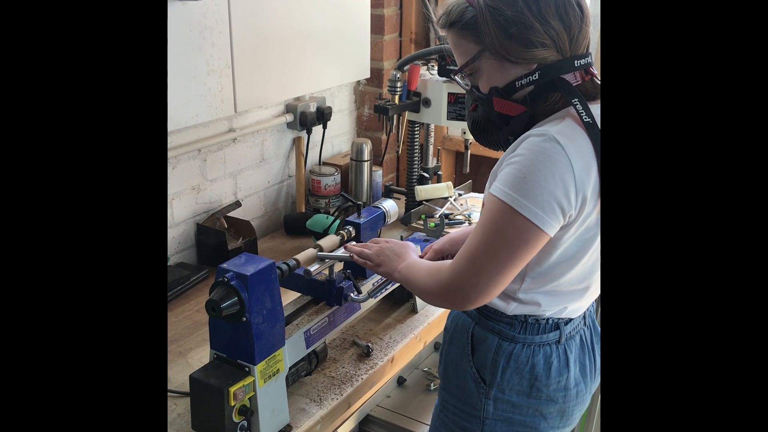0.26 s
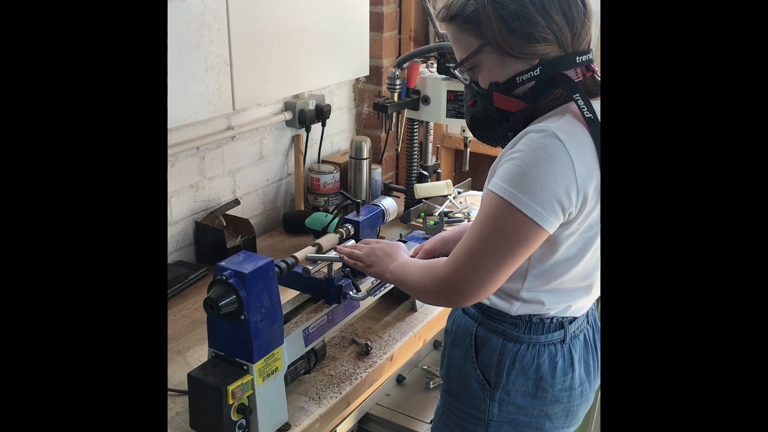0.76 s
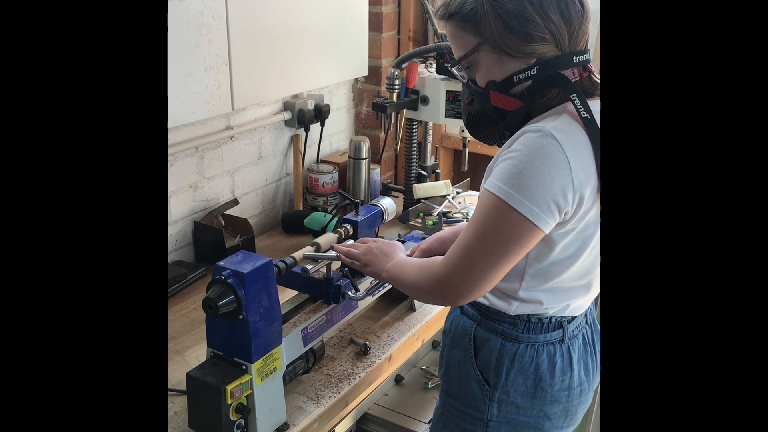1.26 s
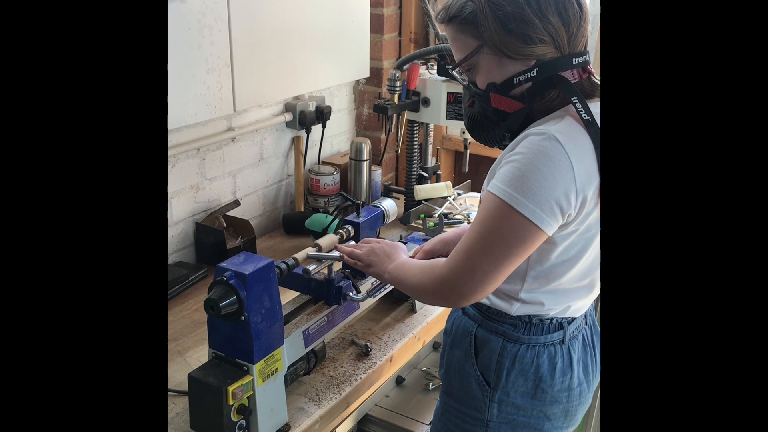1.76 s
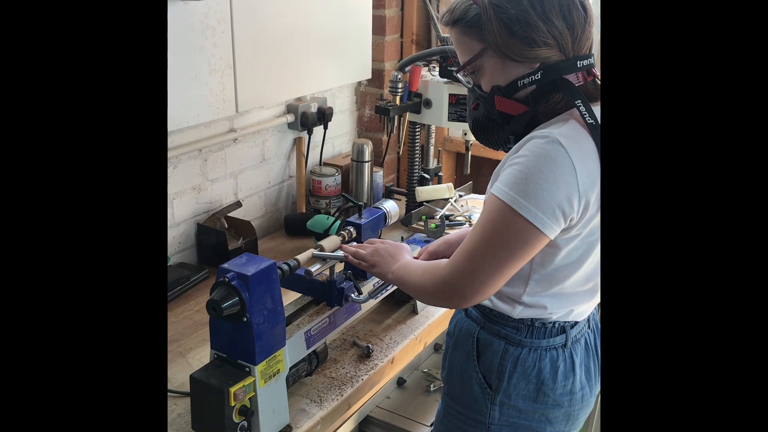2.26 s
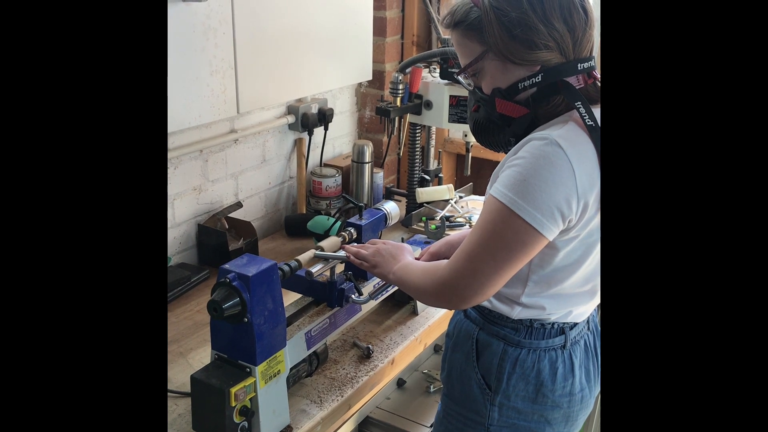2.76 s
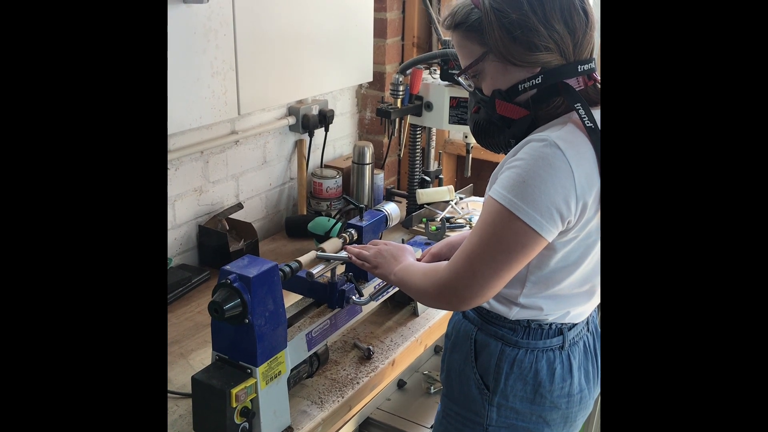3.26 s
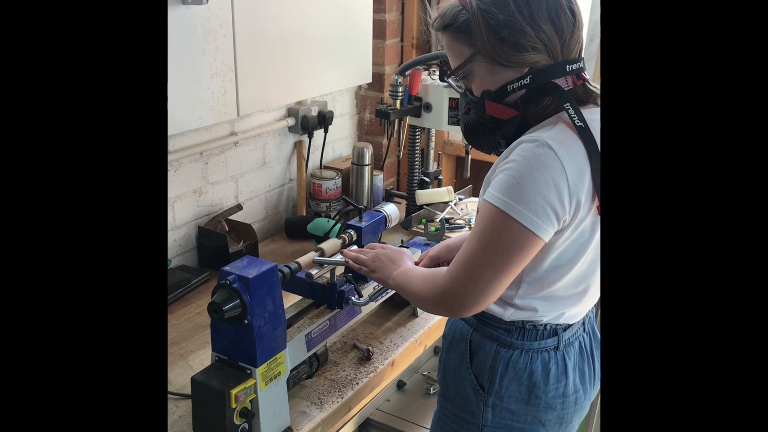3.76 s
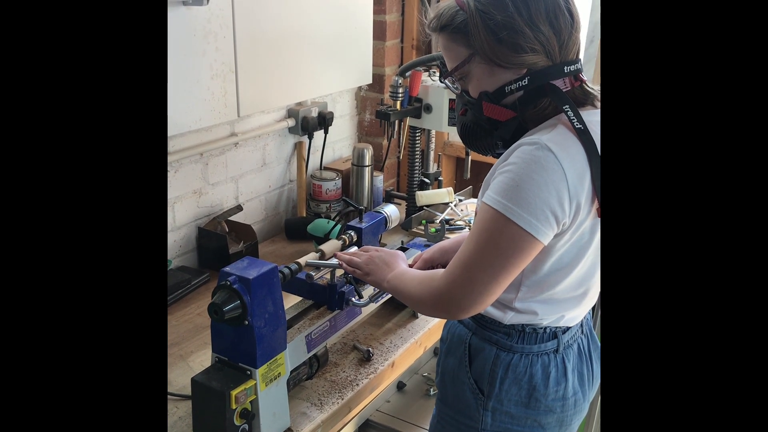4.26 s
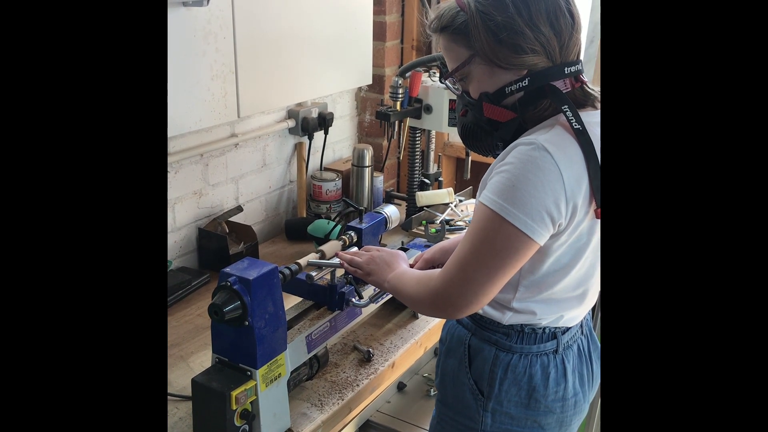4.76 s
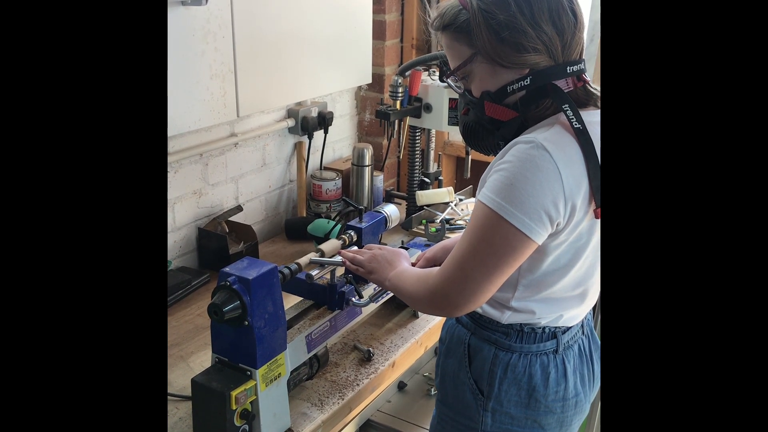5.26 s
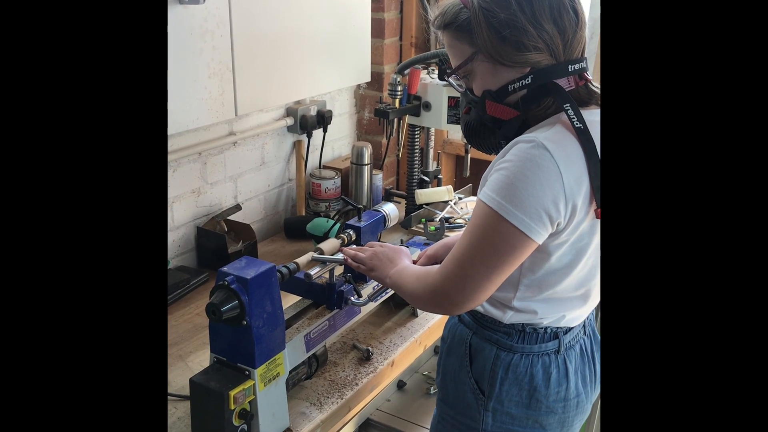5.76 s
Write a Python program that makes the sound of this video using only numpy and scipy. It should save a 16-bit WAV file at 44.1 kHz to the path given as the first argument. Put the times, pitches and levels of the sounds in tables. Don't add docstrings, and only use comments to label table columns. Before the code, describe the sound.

A small electric lathe whines steadily while a gouge rasps and chatters on spinning wood in two long passes, with plain motor whine between.

```python
import sys
import numpy as np
from scipy import signal
from scipy.fft import rfft, irfft
from scipy.io import wavfile
from scipy.ndimage import uniform_filter1d

SR = 44100
rng = np.random.default_rng(int(sys.argv[2]) if len(sys.argv) > 2 else 0)


def store_wav(level_fs):
    pcm = np.round(np.clip(np.atleast_2d(level_fs), -1, 1) * 32767)
    wavfile.write(sys.argv[1], SR, pcm.T.astype(np.int16))


def to_linear_factor(level_db):
    exponent = np.asarray(level_db, float) / 20
    return 10 ** exponent


N = 264592
T = np.arange(N) / SR

# time [s], pressure [dB], place along the blank [0-1],
# slack of the grip [dB].
PASSES = [
    [(0.0, -26.5, 0.2, -6), (0.058, -33, 0.7, -11), (0.1, -42, 0.6, -14)],
    [(1.235, -41, 0.6, 5.5), (1.38, -37.5, 0.6, 5), (1.49, -28, 0, 3.3), (1.79, -26, 0.6, 2),
     (2.02, -25.5, 0.81, -1), (2.36, -29.5, 0.82, -1), (2.72, -32.5, 0.99, 1), (3.1, -27.5, 0.86, -0.5),
     (3.33, -42.5, 0.62, -1)],
    [(4.3, -28.5, 0, 3), (4.5, -26, 0.36, 5.5), (4.66, -25.5, 0.55, 5.5), (4.8, -22, 0, -1.5),
     (5.06, -26, 0.66, 1), (5.43, -23.5, 0.32, -2.5), (5.56, -22.5, 0.7, 0.5), (5.8, -31, 0.73, -4.5),
     (6.0, -29, 0.98, 0)],
]
# start [s], peak [dB], sharpness of the cut
# [dB].
BITES = [(1.25, -27.5, -10), (1.298, -16.5, -15), (1.353, -18, -20), (1.408, -15.5, -24),
         (1.463, -17.5, -22), (1.508, -25.5, -7), (1.573, -21.5, -24), (1.626, -26, -25),
         (1.694, -16.5, -28), (1.769, -18, -9), (1.82, -13, -15), (1.913, -16.5, -21),
         (2.04, -22, -18), (2.161, -18, -24), (2.216, -23, -9), (2.342, -22.5, -12),
         (2.399, -19, -27), (2.458, -15.5, -14), (2.517, -15.5, -23), (2.574, -14, -18),
         (2.639, -14, -17), (2.694, -17.5, -16), (2.753, -14.5, -15.5), (2.811, -13, -19),
         (2.872, -14, -28), (2.93, -21, -10), (3.047, -21.5, -8), (3.168, -17, -24),
         (3.228, -13, -40), (3.285, -22.5, -20),
         (4.317, -28, -10), (4.365, -20, -12), (4.435, -13.5, -15.5), (4.499, -13, -13.5),
              (4.573, -22, -10), (4.602, -18.5, -6), (4.657, -20.5, -8), (4.705, -13.5, -51),
              (4.769, -14, -42), (4.828, -23.5, -44), (4.962, -14.5, -21), (5.017, -19.5, -19),
              (5.07, -14.5, -25), (5.139, -14.5, -50), (5.257, -13.5, -28), (5.339, -16.5, -26),
              (5.394, -19.5, -15), (5.488, -19, -38), (5.524, -30, -43), (5.609, -24, -43),
              (5.671, -12.5, -9.5), (5.734, -12.5, -27), (5.789, -16, -29), (5.85, -16.5, -16),
              (5.922, -15, -23), (5.976, -13.5, -14.5)]

# frequency [Hz], width [Hz], level [dB].
BLANK = [(655, 25, -9), (738, 22, 4), (775, 60, -3)]
REST = [(904.5, 54, 5.5), (920, 32, 5), (963, 30.5, 6), (1065, 15, 3), (1121, 37, -4), (1354, 41, 4.5)]
POST = [(1665, 34, 0), (1735, 40, 0), (1870, 40, -9)]
SHANK = [(2242, 30, -1), (2295, 30, -2), (2335, 30, -4), (2410, 45, -4), (2465, 55, 0), (2560, 60, -9),
         (2660, 70, -8)]
STEEL = [(3090, 66, -10), (3325, 40, -2), (3540, 50, -3), (3940, 60, -6), (4170, 70, -5), (4650, 300, -11),
         (5115, 85, -3), (5290, 90, -5), (5550, 65, -7), (5940, 85, -5), (6620, 200, -9), (7290, 140, -1)]
BED_LOW = [(240, 22, -2), (257, 25, 0), (283, 35, -5)]
BED = [(305, 30, -5), (330, 30, -7), (354, 24, 0), (390, 32, -7), (420, 30, -11), (448, 25, -10)]
SPRAY = [(7300, 400, -1), (8500, 900, -3), (10200, 300, -3), (11650, 450, -1), (12700, 1200, -9),
         (14000, 1500, -14), (15300, 600, -10)]
# frequency [Hz], density [dB per Hz].
TEARING = [(59, -49), (100, -27), (365, 12.5), (513, 0.5), (752, 7), (2040, 0), (2420, -5), (7290, -5.5),
           (16000, -135)]
# multiple of the spindle turn, level [dB].
THUMP = [(4, 0), (5, -7), (8, -6), (9, -12)]

# multiple of the commutator rate, level [dB].
WHINE = [(4, -10), (6, -12.5), (7, -20.5), (10, -16), (12, -17), (14, -18), (15, -16), (16, -10.5),
         (17, -7), (18, -15), (20, -13.5), (22, -8), (23, -12), (24, -9), (25, -13), (29, -13), (34, -11),
         (35, -26)]
# frequency [Hz], level [dB rms].
BEARINGS = [(130, -76), (146, -55.5), (205, -70), (257, -62.5), (278, -62), (309, -57.5), (393, -58),
            (412, -54.5), (622, -73), (825, -61), (926, -58), (969, -62), (1115, -69), (4873, -72),
            (5114, -92), (5290, -59), (6040, -54), (7800, -56), (8397, -54), (11190, -54.5), (11730, -60),
            (13950, -73)]
# cage turns off the tone, level under the whine [dB].
CAGE = [(-2, -16), (-1, -12), (0, -9.5), (1, -15)]
# frequency [Hz], level [dB rms].
MAINS = [(99.8, -52.5), (199.6, -97)]
# frequency [Hz], density [dB per Hz].
BRUSH = [(15, -56), (25, -14), (92, -4), (354, -6.5), (405, -5.5), (560, -13.5), (734, -8), (1040, -16.5),
         (2050, -10), (2280, -15.5), (2690, -18.5), (3720, -13.5), (4740, -15.5), (8360, -9), (16000, -16)]
# frequency [Hz], width [Hz], level [dB].
HOUSING = [(750, 28, 10), (1160, 220, 8.5), (2663, 210, 14), (3600, 120, -11), (4080, 100, 4.5),
           (4795, 290, 11), (5250, 910, 3.5), (6100, 150, 10.5), (7550, 270, 6.5), (8420, 380, 6),
           (9200, 340, -3), (11820, 105, 13), (13900, 220, -5)]
# frequency [Hz], t60 [s].
SHOP = [(100, 0.071), (1000, 0.24), (5000, 0.76), (15000, 0.17)]


def cut(rate, scrape, place, slack_db):
    low, bed = along(place, (-7, -10)), along(place, (-28, 1.9))
    jolt, bench = along(place, (-7, 2.5)), along(place, (-19, -17.5))
    bite, spray, blank, post, steel = bites()
    post = post * to_linear_factor(slack_db)
    steel = steel * to_linear_factor(0.3 * slack_db)
    turns = np.cumsum(rate) / SR / 20

    bounce_db, bounce_lag_s = -19.5, 0.029
    skipped = np.roll(uniform_filter1d(bite, 900), round(bounce_lag_s * SR))
    grip = to_linear_factor(0.37 * drift(57, count=1)[0])
    scrape = scrape * to_linear_factor(bounce_db * skipped)
    snaps = fibres(per_s=7000, spread_db=3) * grip
    tear = np.hypot(scrape, to_linear_factor(-6) * bite) * snaps
    knock = np.hypot(to_linear_factor(-2) * scrape, to_linear_factor(-5) * bite) * snaps

    wood = along(place, (-1.5, 4)) * blank * knock
    sound = to_linear_factor(-0.5) * rung(wood, BLANK, wander_db=2.5)
    sound += to_linear_factor(-5) * rung(tear, REST, wander_db=2)
    sound += to_linear_factor(-2) * rung(post * tear, POST, wander_db=3.5)
    sound += to_linear_factor(-2.5) * rung(steel * tear, STEEL, wander_db=4.5)
    sound += to_linear_factor(-2) * rung(np.sqrt(post * steel) * tear, SHANK, wander_db=3.5)
    sound += to_linear_factor(-33.5) * coloured(tear, TEARING)

    shove = uniform_filter1d(jolt * bite / (bed + low), 500, origin=240)
    heave = np.hypot(to_linear_factor(7) * scrape, shove)
    ridges = heave * (0.25 * surface(turns, memory=0.9) + 0.65 * rng.standard_normal(N))
    frame = rung(low * ridges, BED_LOW, wander_db=3) + rung(bed * ridges, BED, wander_db=1.5)
    bed_band = signal.butter(4, [228, 465], "band", fs=SR, output="sos")
    sound += to_linear_factor(-2.5) * signal.sosfilt(bed_band, frame)

    chips = np.hypot(spray, to_linear_factor(-20.5) * scrape) * fibres(per_s=8000, spread_db=-5)
    sound += to_linear_factor(-2.5) * rung(chips, SPRAY, wander_db=4.5)
    weight = uniform_filter1d(np.hypot(scrape, to_linear_factor(-7) * bite), 5000, origin=1500)
    return sound + first_touch(turns) + to_linear_factor(3) * bench * weight * thump(turns)


def passes():
    out = np.zeros((4, N))
    for rows in PASSES:
        s, pressure_db, place, slack_db = np.transpose(rows)
        landed = T - s[0] + (s[0] < .1)
        leaving = s[-1] - T + (s[-1] > 5.9)
        touch = np.clip(np.minimum(landed, leaving) / .02, 0, 1)
        pressure = to_linear_factor(np.interp(T, s, pressure_db))
        out += touch * np.array([pressure, np.interp(T, s, place), np.interp(T, s, slack_db), np.ones(N)])
    return out


def bites():
    rise, hold, fall = .006, .0087, .016
    s, peak_db, sharp_db = np.transpose(BITES)
    marks = np.zeros((2, N))
    marks[:, (s * SR).astype(int)] = to_linear_factor([peak_db, peak_db + sharp_db])
    t = np.arange(SR // 8) / SR
    shape = (1 - np.exp(-(t / rise) ** 2)) * np.exp(-np.maximum(t - hold, 0) / fall)
    lead = int(rise * SR)
    force, spray = signal.oaconvolve(marks, shape[None], axes=1)[:, lead:lead + N]
    share_db, db_per_sharp_db = [-5, -5.5, -3], [-0.081, 0.077, 0.21]
    scatter_db = rng.standard_normal((len(s), 3))
    shares_db = share_db + np.outer(sharp_db + 14, db_per_sharp_db) + scatter_db
    shares = [to_linear_factor(np.interp(T, s + hold, db)) for db in shares_db.T]
    return force, spray, *shares


def fibres(per_s, spread_db):
    size = to_linear_factor(spread_db * np.minimum(rng.exponential(1, N), 4)) * rng.choice([-1, 1], N)
    return evened(size * (rng.random(N) < per_s / SR))


def surface(turns, memory):
    ridges = rng.standard_normal((int(turns[-1]) + 2, 512))
    ridges = signal.lfilter([1], [1, -np.clip(memory, 0, .98)], ridges, axis=0)
    return evened(np.interp(turns * 512, np.arange(ridges.size), ridges.ravel()))


def first_touch(turns):
    touch_db, fade_s = [[-29.5], [-24.5]], 0.049
    since = T - np.array([[rows[0][0] + .012] for rows in PASSES[1:]])
    swell = np.clip(since / .008, 0, 1) * np.exp(-np.maximum(since, 0) / fade_s)
    tone = np.sin(2 * np.pi * BLANK[1][0] * T + 1.3 * np.sin(2 * np.pi * turns))
    return (to_linear_factor(touch_db) * swell).sum(0) * tone


def thump(turns):
    sway = drift(6.4, count=2 * len(THUMP))
    beat = np.zeros(N)
    for (k, db), level, phase in zip(THUMP, sway[::2], sway[1::2]):
        beat += to_linear_factor(db + 2.5 * level) * np.sin(2 * np.pi * k * turns + .45 * phase)
    return evened(beat)


def motor(rate, whine_db, load):
    bars = np.cumsum(rate + 2.8 * load * drift(6.96, count=1)[0]) / SR
    tones = [(k, -44.5 + db) for k, db in WHINE]
    tones += [(hz / 341.5, db) for hz, db in BEARINGS]
    slip = drift(6.8, count=len(tones))
    whine = np.zeros(N)
    for i, ((k, db), level, phase) in enumerate(zip(tones, slip[::-1], slip)):
        whine += to_linear_factor(db) * (1 + 0.081 * level) * np.sin(2 * np.pi * k * bars + 0.026 * k * phase + i * i)
    whine += to_linear_factor(whine_db - 3) * np.sin(16 * np.pi * bars)
    for n, db in CAGE:
        order = 2.17 + n / 18
        whine += to_linear_factor(whine_db + db) * np.sin(2 * np.pi * order * bars + 0.96 * slip[n])
    hum = sum(to_linear_factor(db) * np.sin(2 * np.pi * hz * T) for hz, db in MAINS)
    return np.sqrt(2) * (to_linear_factor(-3 * load) * whine + hum) + to_linear_factor(-39.5 - 0.31 * load) * brushes(bars)


def brushes(bars):
    sparks = 1 + 0.31 * np.cos(2 * np.pi * bars)
    sparks += 0.043 * np.cos(2 * np.pi * MAINS[0][0] * T)
    sparks += 0.24 * np.cos(2 * np.pi * bars / 6)
    hz = np.fft.rfftfreq(N, 1 / SR)
    shell_db = sum(db / (1 + (2 * (hz - f) / width) ** 2) for f, width, db in HOUSING)
    hiss = irfft(rfft(sparks * rng.standard_normal(N)) * to_linear_factor(shell_db), N)
    return coloured(hiss, BRUSH)


def speed(load):
    second = T >= 2.3
    since = T - np.where(second, 3.3, .05)
    free_hz, sag_hz, catch_up_s, overshoot_hz, settle_s = 341.2, 12.5, .05, 2.4, .47
    free = free_hz - sag_hz * np.exp(-abs(since) / catch_up_s)
    free = free + overshoot_hz * np.exp(-(since / settle_s) ** 2)
    held = uniform_filter1d(np.where(abs(since) < .1, 0, load), 4000, origin=1200)
    rate = free + held * (337 - free)
    off = 2 * (free - 340.8) / 3
    slope, most_drop_db = 1.3, 7.5
    whine_db = -39 - most_drop_db * np.tanh(10 * slope * np.log10(1 + off ** 2) / most_drop_db)
    whine_db = whine_db + held * (-52 - whine_db)
    slow_s, lap_s, dip_hz = np.where(second, 3.9, .94), 0.17, 0.59
    return rate - dip_hz * np.cos(2 * np.pi * (T - slow_s) / lap_s), whine_db


def shop(x):
    taps = np.zeros(SR // 2)
    at = np.arange(120, len(taps) - 20, 20)
    taps[at + rng.integers(0, 20, len(at))] = rng.choice([-1., 1.], len(at))
    hz, t, z = signal.stft(taps, SR, nperseg=256)
    decay = to_linear_factor(-60 * t / read(SHOP, hz)[:, None])
    tail = signal.istft(z * decay, SR, nperseg=256)[1]
    return signal.fftconvolve(x, tail / np.linalg.norm(tail))[:N]


def rung(x, modes, wander_db):
    out, power = np.zeros(N), 0
    shifts = drift(16.5, count=len(modes))
    for i, ((hz, width, db), shift) in enumerate(zip(modes, shifts)):
        r = np.exp(-np.pi * width / SR)
        poles = [1, -2 * r * np.cos(2 * np.pi * hz / SR), r * r]
        ring = signal.lfilter([1 - r, 0, r - 1], poles, x * to_linear_factor(wander_db * shift))
        out += (-1) ** i * to_linear_factor(db) * ring
        power += to_linear_factor(2 * db) * np.pi * width / SR
    return out / np.sqrt(power)


def along(place, ends_db):
    return to_linear_factor(ends_db[0] + place * (ends_db[1] - ends_db[0]))


def drift(hz, count):
    knots = rng.standard_normal((int(N / SR * 200), count))
    knots = signal.lfilter([1], [1, -np.exp(-2 * np.pi * hz / 200)], knots, axis=0)
    return [np.interp(T, np.arange(len(k)) / 200, evened(k)) for k in knots.T]


def coloured(x, points):
    gain = to_linear_factor(read(points, np.fft.rfftfreq(N, 1 / SR)))
    return evened(irfft(rfft(x) * gain, N))


def read(points, hz):
    f, value = np.transpose(points)
    return np.interp(np.log(hz + 1), np.log(f + 1), value)


def evened(x):
    return x / np.sqrt(np.mean(x ** 2) + 1e-20)


def scene():
    scrape, place, slack_db, load = passes()
    rate, whine_db = speed(load)
    cutting = cut(rate, scrape, place, slack_db)
    dry = motor(rate, whine_db, uniform_filter1d(load, 3000)) + to_linear_factor(-1.5) * cutting
    return (dry + to_linear_factor(-10) * shop(dry))[None]


def low_pass(x):
    return signal.sosfilt(signal.butter(12, 16450, fs=SR, output="sos"), x)


def record(dry):
    bass_cut = signal.butter(6, 57, "high", fs=SR, output="sos")
    mix = signal.sosfilt(bass_cut, dry)
    mix = .6 * np.tanh(mix / .6)
    band_limit = signal.firwin(1023, 15740, window=("kaiser", 9), fs=SR)
    mix = signal.oaconvolve(mix, band_limit[None], "same")
    return low_pass(mix)


dry = scene()
out = record(dry)
store_wav(out)
```